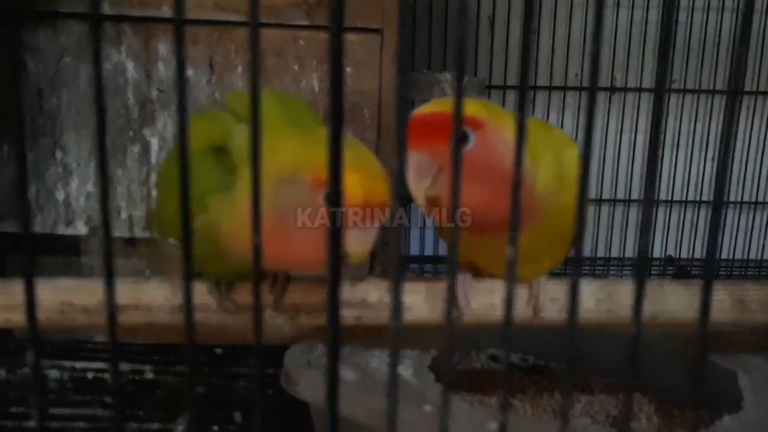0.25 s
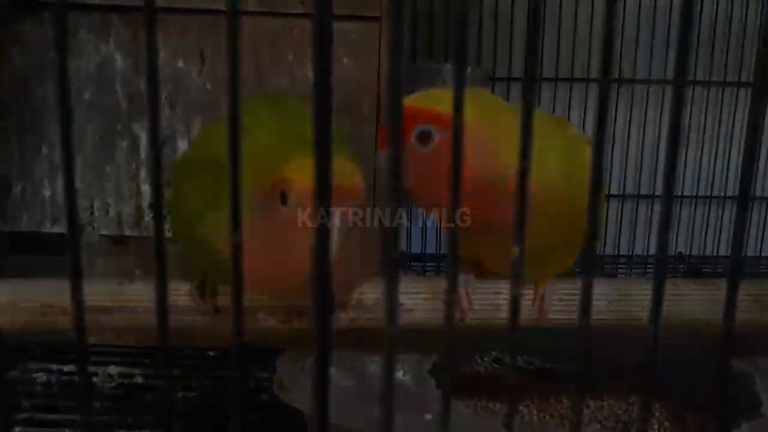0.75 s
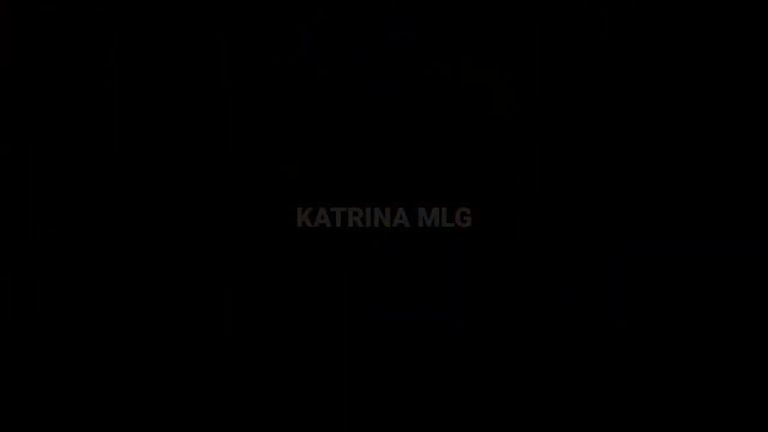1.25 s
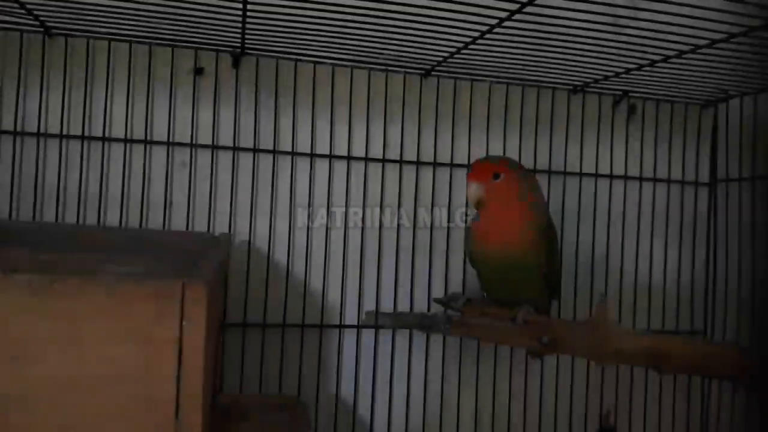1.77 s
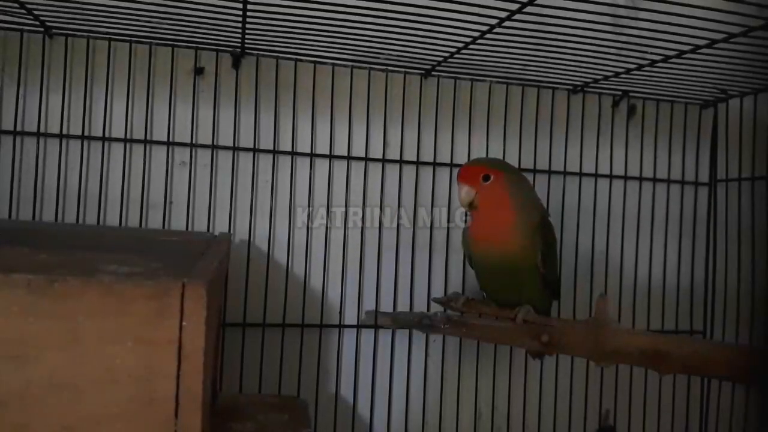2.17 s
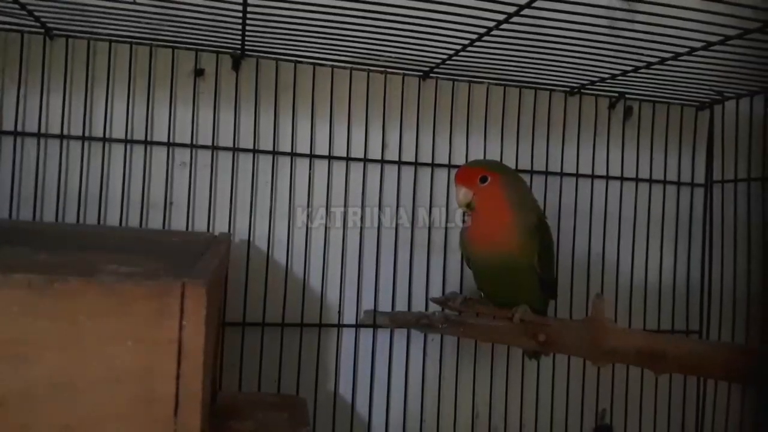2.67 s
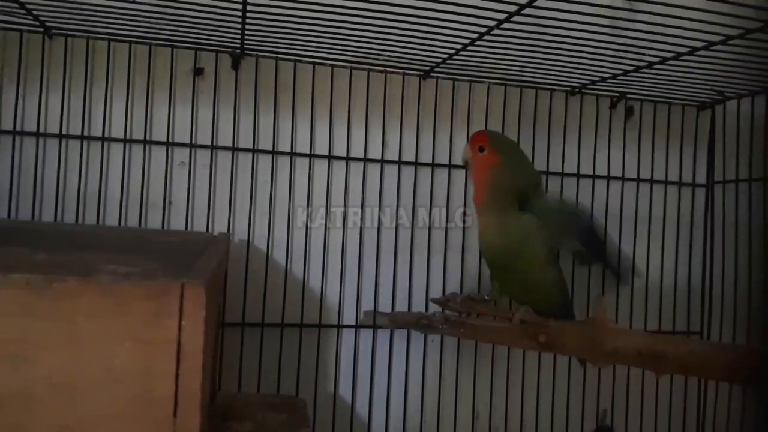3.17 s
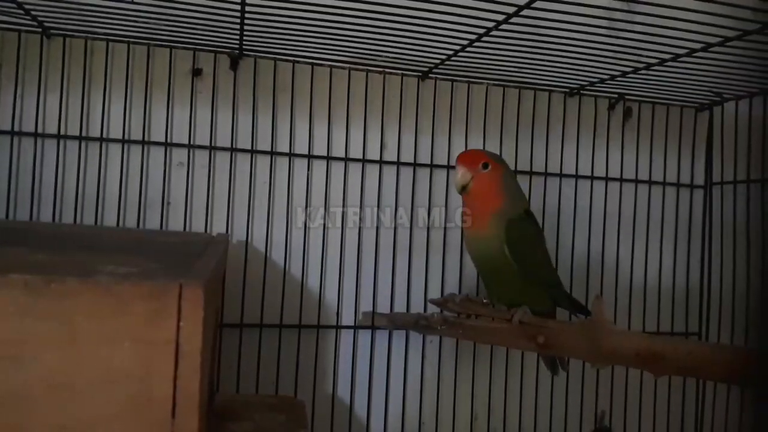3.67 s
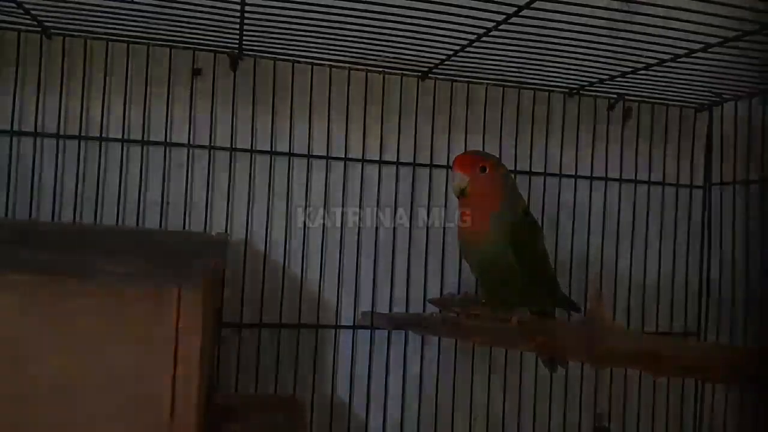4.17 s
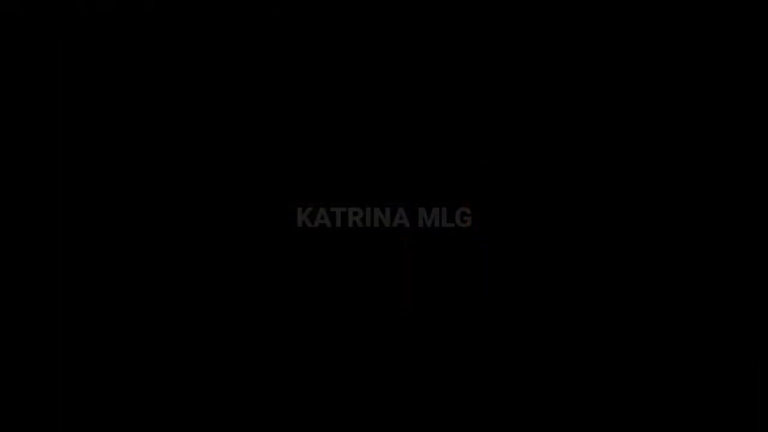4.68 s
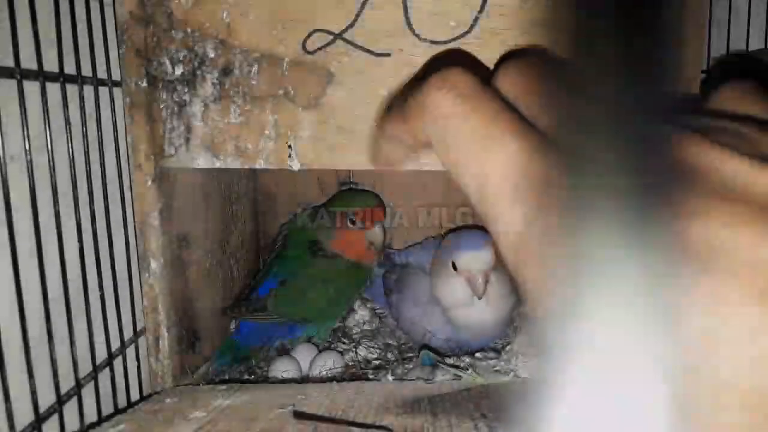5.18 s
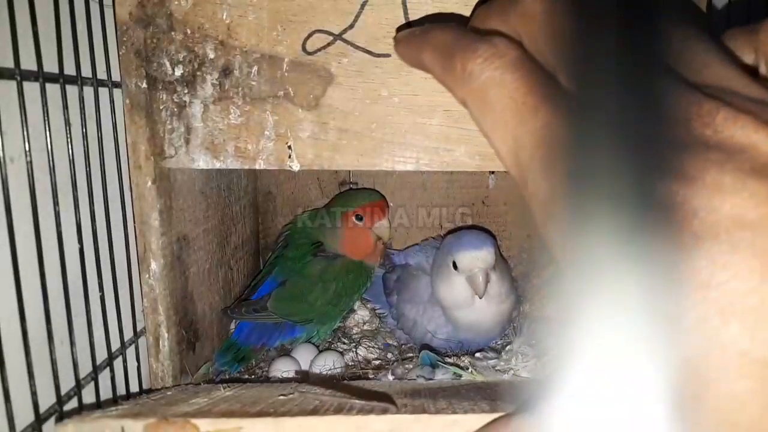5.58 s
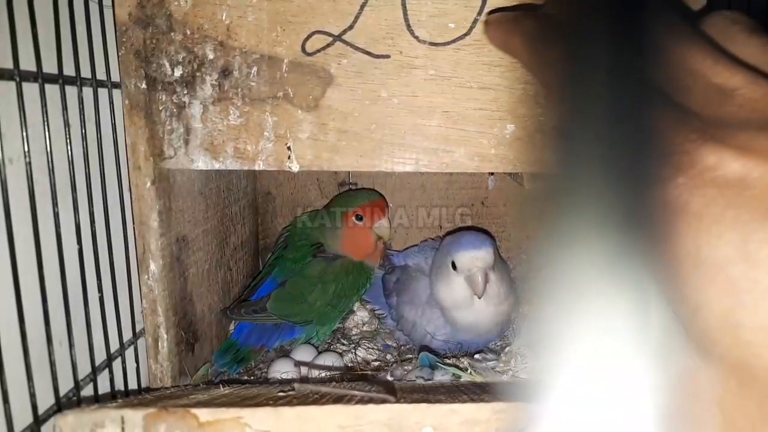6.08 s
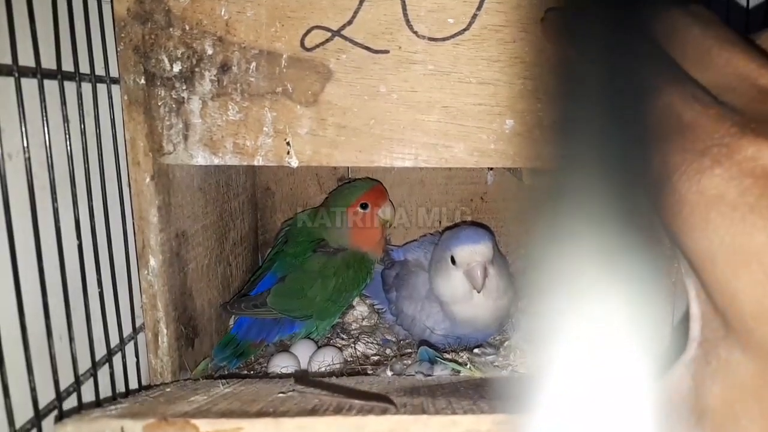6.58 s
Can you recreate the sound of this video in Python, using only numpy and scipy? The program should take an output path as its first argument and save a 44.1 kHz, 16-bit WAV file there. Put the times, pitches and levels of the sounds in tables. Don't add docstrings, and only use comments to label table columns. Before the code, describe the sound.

Lovebirds call close to the microphone in a small reverberant space. After a quiet twittering opening come separate shrill shrieks, a loud steady one leading into a rapid harsh burst with flapping and feather rustle in the middle. A brief lull, then several rougher, weaker calls smeared by wall reflections. An abrupt change leaves faint faraway birds, low hum and small knocks. The left channel is clear, the right nearly blocked and much duller.

```python
import sys
import numpy as np
from scipy import signal
from scipy.fft import rfft, irfft, next_fast_len
from scipy.io import wavfile
from scipy.ndimage import uniform_filter1d, minimum_filter1d

SR = 44100
rng = np.random.default_rng(int(sys.argv[2]) if len(sys.argv) > 2 else 0)


def bounce(signal):
    frames = np.transpose(np.atleast_2d(signal))
    limited = np.clip(frames, -1, 1)
    pcm = np.round(limited * 32767).astype(np.int16)
    wavfile.write(sys.argv[1], SR, pcm)


def boost_factor(decibels):
    exponent = np.asarray(decibels, float) / 20
    return 10 ** exponent


N = 301555


def evened(x):
    return x / np.sqrt(np.mean(x ** 2) + 1e-20)


def read(points, hz):
    f, value = np.transpose(points)
    return np.interp(np.log(hz + 1), np.log(f + 1), value)


def coloured(x, points):
    size = next_fast_len(len(x) + 512)
    gain = boost_factor(read(points, np.fft.rfftfreq(size, 1 / SR)))
    return irfft(rfft(x, size) * gain, size)[:len(x)]


def add(mix, s, sound):
    part = mix[round(s * SR):][:len(sound)]
    part += sound[:len(part)]


def wobble(count, hz):
    lowpass = signal.butter(2, hz, fs=SR, output="sos")
    return evened(signal.sosfilt(lowpass, rng.standard_normal(count + 500))[500:])


def fuzzy(hz, width):
    wander = wobble(len(hz), width / 2) + 1j * wobble(len(hz), width / 2)
    return (wander * np.exp(2j * np.pi * np.cumsum(hz) / SR)).real


def near_birds():
    # t/s, rise/s, hold/s, effort/dB, swell over the hold/dB
    long_calls = [
        (.79, 0.033, .057, -18, 3),
        (1.214, 0.031, 0.083, -28.5, 2.5),
        (1.524, 0.027, .1, -24, 3),
        (2.701, .026, 0.133, -17, 0),
        (4.25, 0.043, 0.083, -26, 3),
        (4.601, 0.029, 0.073, -24, 2),
        (4.966, 0.027, 0.19, -26.5, -8.5),
        (5.334, 0.018, 0.098, -38, -3),
    ]
    # f when risen/Hz, f at the turn/Hz, turn within the hold/0-1, f after the break/Hz, harshness/0-1
    tunes = [(2325, 2450, .45, 2000, .08), (2440, 2529, .66, 2220, .13), (2337, 2573, .98, 2255, .14),
             (2240, 2390, .8, 2080, .5), (2330, 2400, .6, 2500, .5), (2220, 2390, .95, 2540, .4),
             (2350, 2440, .32, 2270, .38), (2000, 2330, .92, 2090, .42)]
    # opening harshness/0-1, climb made half way up/0-1, break/s, harshness after it/0-1, tail/s
    edges = [(.8, .75, .025, .45, .008), (.6, .95, .008, .42, .042), (.7, .5, .008, .9, .035),
             (.12, .0, .007, .8, .025), (.7, .6, .007, .75, .03), (.9, .25, .006, .6, .02),
             (.75, .55, .01, .7, .022), (.6, .3, .04, .4, .008)]
    # f/Hz, level relative to the effort/dB, and harshness at the top/0-1
    openings = [(1898, -22, .1), (1898, -14, .13), (1850, -22, .2), (1900, -15, .55), (1700, -18, .28),
                (1898, -15, .27), (1898, -22, .5), (1720, -10, .45)]
    # wall share/dB, brightness/dB per octave, beam over 11.5 kHz/dB, fundamental/dB, air hiss/dB
    long_places = [(-2.5, -2.5, 3, -1.5, -7), (-1, -3, 8.5, 0.5, -4), (-2, -4.5, 9.5, -0.5, 1.5),
                   (-3, 3.5, -5.5, 6, 1), (-4, 3.5, -0.3, 6.5, -1), (-3, 2, -0.5, 4, 5),
                   (-2.5, 2.5, -0.5, 5.5, 5.5), (-6, -0.5, 5, 3.5, 5)]
    # t/s, length/s, effort/dB, swell/dB, harshness/0-1
    notes = [(.796, .012, -26.5, 1.5, .4), (2.036, .024, -42, -17, 0.45), (2.725, .15, -27, 2, .25),
             (2.985, .013, -14.5, 1, .7), (2.998, .043, -7, -2, .05), (3.041, .013, -9, -2.5, 0.5),
             (3.055, 0.045, -11.5, -3.5, .05), (3.098, 0.04, -21, -8, 0.12), (3.083, .09, -19, -8, 0.3),
             (3.086, 0.088, -17, -9, 0.42), (3.24, .01, -21, 10, 0.6), (3.25, .0258, -11.5, -3, .2),
             (3.2765, .073, -12.5, 0, 0.05), (3.355, .012, -15, -6, .2), (3.367, .04, -17, -16.5, .75),
             (4.184, 0.04, -37, -1, 0.4), (4.18, 0.035, -43, -6, 0.4), (1.657, .045, -25, -6, .85),
             (2.865, .06, -22, -10, .3), (2.824, .045, -32, -3, .1), (3.052, .04, -36, -4, .2),
             (3.348, .008, -17, 0, .3), (4.705, .095, -25, -5, .75), (4.973, .012, -29, 0, .9),
             (4.99, .09, -31, -4, .35), (4.785, .03, -44, -6, .2), (5.492, .06, -44, -4, .35)]
    # f at start/Hz, f at end/Hz
    glides = [(2601, 2484), (3744, 3500), (6560, 6640), (1945, 3000), (2462, 2468), (2480, 2620),
              (6515, 6505), (6510, 6490), (2730, 2720), (2430, 2250), (1820, 1800), (2175, 2245),
              (2070, 2092), (2920, 2900), (2705, 2300), (5600, 5150), (6900, 6100), (2600, 2280),
              (2650, 2450), (10950, 10850), (15250, 15350), (6500, 7100), (2600, 2500), (2050, 2300),
              (2690, 2620), (3620, 3650), (2090, 2440)]
    # wall share/dB, brightness/dB per octave, beam over 11.5 kHz/dB, fundamental/dB
    note_places = [(-5, -3.5, -5.5, -13.5), (5, -4, -15, -4.5), (-5, -8, -6, 2.5), (-19, -2, -4, -4),
                   (-18, -4.5, -2, -14), (-19, -2, -4, -9), (-13, -4, -4, 2), (-13, -4, -4, 2),
                   (-8.5, .5, -1.5, -4), (-5, 1, -7, -4), (-13, 5, -4, 1.5), (-16, 3, -2, 7),
                   (-19, -1.5, 1, -12), (-3, -8, 5, -9), (-6, -5.5, -.5, -15.5), (-9.5, -1.5, -35, -4),
                   (-6, -4, 0, 2), (-6.5, -2, -1.5, -6.5), (-4, 9, -16, 6), (-6, 0, 0, 0), (-8, 0, 0, 0),
                   (-15.5, -4, -3, 1), (-2, -0.5, 4, 2), (-16, -13, 0, -8), (-3, -4.5, 12, -2),
                   (1, -12, -2, -2), (-9.5, -0.5, 0, 1)]
    direct, bounced = np.zeros((2, N))
    kinds = [(long_call, (long_calls, tunes, edges, openings), long_places),
             (short_note, (notes, glides), note_places)]
    for shape, tables, places in kinds:
        for call, (wet_db, tilt_db, beam_db, first_db, *air_db) in zip(np.hstack(tables), places):
            s, sound = shriek(shape(*call, first_db), wet_db, tilt_db, beam_db, *air_db)
            add(direct, s, sound)
            add(bounced, s, boost_factor(wet_db) * sound)
    return direct, bounced


def long_call(start, rise, hold, effort_db, swell_db, risen_hz, top_hz, top, broken_hz, harsh,
              open_harsh, climbed, snap, end_harsh, tail, open_hz, open_db, top_harsh, first_db):
    lag_db = -5.5
    arch_db, sag_hz_per_s = 0.5, 1400
    break_db, tail_db, tail_thin_db = -4.5, -15, -14.5
    held, end_db = start + rise + hold, effort_db + swell_db
    after_top = (1 - top) * hold
    half_hz = open_hz + climbed * (risen_hz - open_hz)
    return [(start, effort_db + open_db, open_hz, open_harsh, first_db),
            (start + rise / 2, effort_db + lag_db, half_hz, open_harsh, first_db),
            (start + rise, effort_db, risen_hz, harsh, first_db),
            (held - after_top, effort_db + top * swell_db + arch_db, top_hz, top_harsh, first_db),
            (held, end_db, top_hz - sag_hz_per_s * after_top, top_harsh, first_db),
            (held + snap, end_db + break_db, broken_hz, end_harsh, first_db),
            (held + snap + tail, end_db + tail_db, broken_hz, end_harsh, first_db + tail_thin_db)]


def short_note(start, length, effort_db, swell_db, harsh, first_hz, last_hz, first_db):
    return [(start, effort_db, first_hz, harsh, first_db),
            (start + length, effort_db + swell_db, last_hz, harsh, first_db)]


def shriek(rows, wet_db, tilt_db, beam_db, air_db=0):
    # f/Hz, level/dB
    beak_colour = [(1400, -26), (2300, -16), (2750, -11), (3230, -26), (3750, -2.5), (5000, -2), (6500, -5),
                   (7400, -19.5), (8500, -23.5), (10000, -22.5), (12500, -14), (14800, -26), (15500, -33.5),
                   (15900, -71.5)]
    # f/Hz, level/dB
    breath_colour = [(700, -36.5), (1500, -29.5), (2400, -15.5), (3250, -9.5), (4800, -12), (6500, -14),
                     (8400, -19.5), (12000, -23), (15400, -22), (15900, -68)]
    rasp_hz = 165
    s, *columns = np.transpose(rows)
    t = np.arange(s[0], s[-1], 1 / SR)
    effort_db, hz, harsh, first_db = (np.interp(t, s, c) for c in columns)
    harsh = np.clip(harsh, 0, 1)
    rasp = np.cos(2 * np.pi * np.cumsum(rasp_hz * (1 + .3 * wobble(len(t), 40))) / SR)
    tremble = .05 * wobble(len(t), 300) + .045 * rasp
    turns = np.cumsum(hz * (1 + harsh * tremble)) / SR
    flutter = .35 * wobble(len(t), 170) + .45 * wobble(len(t), 450) + .9 * rasp
    swing = 1 + harsh * flutter
    tone = np.zeros(len(t))
    for k in range(1, 9):
        beam = beam_db * np.clip(k * hz / 1000 - 11, 0, 1)
        level_db = tilt_db * np.log2(k * hz / 5000) + first_db * (k == 1) + beam
        tone += boost_factor(level_db) * (k * hz < .4 * SR) * np.cos(2 * np.pi * k * turns)
    air = evened(coloured(rng.standard_normal(len(t)), breath_colour))
    fade = np.minimum(1, np.minimum(t - s[0], s[-1] - t) / .0012)
    steady_hiss = boost_factor(-45 - .9 * wet_db)
    voice = evened(coloured(tone * swing * fade, beak_colour))
    hiss = (steady_hiss + .3 * harsh ** 2) * fade * boost_factor(air_db) * air
    return s[0], boost_factor(effort_db) * (voice + hiss)


def wings():
    # t/s, peak level/dB, push/ms
    beats = [(3.0415, -14, 0.77), (3.047, -13.5, 0.77), (3.0505, -14.5, 0.45), (3.0525, -12, .7),
             (3.066, -29, 0.56), (3.07, -21.5, 3), (3.079, -29, 1.7), (3.277, -36, 1.4),
             (3.285, -38.5, 2.2), (3.349, -18, 0.71), (3.356, -35.5, 0.89), (3.364, -51, 8.2)]
    # t of the loudest/s, level/dB, swell/s, fade/s
    rustles = [
        (2.824, -48.5, 0.12, 0.1),
        (3.05, -23.5, 0.049, 0.052),
        (3.12, -45, 0.11, 0.098),
        (3.282, -35, .05, 0.036),
        (3.35, -28.5, 0.055, 0.038),
        (4.39, -60, 0.19, 0.08),
        (4.79, -63.5, 0.38, 0.19),
        (5.08, -66, 0.16, 0.97),
    ]
    feather_colour = [(40, -22.5), (140, -4.5), (700, -10.5), (1600, -10.5), (3500, -10), (7000, -9),
                      (8600, -39.0), (11000, -14.5), (15500, -18.0)]
    depth_db = -23
    out = np.zeros(N)
    for k, (s, db, ms) in enumerate(beats):
        u = np.arange(1500) / SR * 1000 / ms
        sign = (-1) ** (k // 2 + 1)
        add(out, s, sign * boost_factor(db) * np.sin(np.pi * u) * np.exp(-.9 * u) * 1.4)
    out = coloured(out, [(25, -11), (110, 0.5)])
    for peak, peak_db, swell, fade in rustles:
        s = (peak - swell, peak, peak + fade)
        db = peak_db + depth_db * np.array([1, 0, 1])
        t = np.arange(s[0], s[-1], 1 / SR)
        puffs = rng.standard_normal(len(t)) * boost_factor(2.5 * wobble(len(t), 120))
        noise = evened(coloured(puffs, feather_colour))
        add(out, s[0], boost_factor(np.interp(t, s, db) + 3.5) * noise * signal.windows.tukey(len(t), .1))
    return out


def walls(x):
    # f/Hz, t60/s
    ringing = [(300, 0.24), (2500, 0.21), (5000, 0.21), (9000, 0.19), (14000, 0.096)]
    taps = np.zeros((2, SR // 2))
    grid = np.arange(130, SR // 2 - 16, 16)
    at = grid + rng.integers(0, 16, (2, len(grid)))
    np.put_along_axis(taps, at, rng.choice([-1., 1.], at.shape), 1)
    hz, t, z = signal.stft(taps, SR, nperseg=256)
    decay = boost_factor(-60 * t / read(ringing, hz)[:, None])
    tail = signal.istft(z * decay, SR, nperseg=256)[1]
    return signal.fftconvolve(x[None], tail / np.linalg.norm(tail[0]), axes=1)[:, :N]


def far_birds():
    # t/s, length/s, f/Hz, width/Hz, level/dB
    twitters = [(.21, .26, 6160, 260, -58.5), (.275, .065, 4330, 110, -45.5), (.32, .25, 3830, 70, -54),
                (.34, .2, 3080, 200, -64), (.24, .05, 4150, 100, -60), (.33, .12, 4400, 330, -53),
                (.39, .11, 3980, 70, -52), (.44, .12, 4300, 500, -60), (3.72, .12, 4800, 200, -87),
                (3.72, .08, 6300, 200, -86), (.18, .39, 5400, 1700, -62), (.5, .3, 5600, 1400, -64),
                (.28, .17, 13500, 3800, -71), (.59, .13, 3980, 70, -68), (.51, .045, 6400, 600, -65.5),
                (.64, .11, 5900, 760, -68), (5.92, .11, 6550, 150, -69), (5.9, .14, 5000, 350, -70),
                (5.575, .1, 4900, 220, -69), (5.66, .3, 6150, 350, -74), (5.8, .15, 4460, 90, -73),
                (5.64, .52, 5200, 1500, -72), (6.04, .11, 6530, 200, -66), (6.04, .12, 4100, 400, -70),
                (6.22, .12, 6420, 280, -66), (6.22, .14, 5170, 800, -72), (6.71, .33, 4850, 290, -62),
                (6.77, .074, 3900, 450, -60), (6.79, .05, 2980, 120, -65), (6.78, .06, 5980, 700, -63)]
    # t/s, length/s, f/Hz, width/Hz, level/dB
    thuds = [(.78, .023, 360, 19, -57.5), (2.15, .037, 495, 63, -68.5), (2.48, .042, 471, 37, -50),
             (5.19, .14, 365, 45, -68), (5.17, .093, 850, 49, -72), (5.39, .12, 1150, 15, -73),
             (4.55, .218, 193, 210, -65), (5.15, .538, 300, 390, -70), (2.0, .15, 1700, 900, -72),
             (2.43, .2, 940, 760, -68), (6.4, .11, 2025, 1000, -74), (6.62, .19, 367, 355, -62.5),
             (5.5, .22, 1150, 15, -79), (5.8, .12, 1290, 25, -77), (5.82, .08, 1060, 25, -77),
             (6.62, .06, 850, 60, -72)]
    out = np.zeros(N)
    for s, length, hz, width, db in twitters + thuds:
        held = np.full(round(length * SR), hz)
        add(out, s, boost_factor(db) * fuzzy(held, width) * signal.windows.tukey(len(held), .35))
    return out


def knocks():
    # t/s, level/dB, centre f/Hz, width/Hz
    hits = [
        (1.639, -65.5, 924, 950),
        (1.767, -51.5, 1163, 720),
        (1.958, -67, 1695, 913),
        (2.42, -55, 3460, 5000),
        (2.558, -52, 3360, 509),
        (2.559, -57.5, 5390, 3470),
        (6.73, -60, 1330, 1173),
    ]
    out, t = np.zeros(N), np.arange(2000) / SR
    for s, db, hz, width in hits:
        add(out, s, boost_factor(db - 60 * t / 0.098) * fuzzy(hz + 0 * t, width))
    return out


def floor():
    # t/s, level/dB
    hum_levels = [(0, -66.5), (.36, -62), (.72, -67.5), (1.01, -67), (1.478, -74.5), (2.441, -65.5),
                  (3.09, -67), (3.22, -66), (3.41, -82), (4.02, -88.5), (4.45, -78), (4.65, -67.5),
                  (4.76, -72.5), (5.1, -73.5), (5.46, -66.5), (6.3, -65.5), (6.759, -62), (6.84, -57)]
    # f/Hz, level/dB per Hz
    hum_colour = [(15, -48), (25, -23.5), (108, 4), (249, -12.5), (476, -18.5), (659, -24.5), (3520, -32),
                  (6380, -32), (7310, -40), (14800, -34.5), (16000, -38.5)]
    # f/Hz, level/dB
    hiss_colour = [(25, -4.5), (100, -2.5), (300, -18), (1000, -20.5), (3000, -24), (8000, -29),
                   (15500, -29)]
    s, db = np.transpose(hum_levels)
    level_db = np.interp(np.arange(N) / SR, s, db)
    lumps = boost_factor(-0.5 + 1.8 * wobble(N, 24))
    hum = evened(coloured(rng.standard_normal(N), hum_colour)) * lumps
    hiss = evened(coloured(rng.standard_normal(N), hiss_colour))
    hiss_db = 0.43 * (level_db + 70.5) - 80.5
    return np.array([hum * boost_factor(level_db), hiss * boost_factor(hiss_db)])


def scene():
    # f/Hz, level/dB
    housing = [(2800, 0), (3130, -14), (3500, 0), (7950, 0), (8500, -8), (9050, 0)]
    # f/Hz, level/dB
    blocked = [(300, -48.5), (1500, -29), (2400, -20), (5000, -25), (7000, -21), (9000, -18.5),
               (14000, -26)]
    change_s = 5.551
    direct, bounced = near_birds()
    near = boost_factor([[-3.5], [-8]]) * direct + boost_factor([[.1], [3]]) * walls(bounced)
    near *= np.clip((change_s - np.arange(N) / SR) / 0.0017, 0, 1)
    far = far_birds() + knocks()
    distant = boost_factor(-6.0) * far + boost_factor(-4.5) * walls(far)
    birds = near + boost_factor([[.1], [-6]]) * distant
    birds[0] = coloured(birds[0], housing)
    birds[1] = coloured(birds[1], blocked)
    birds[0] += wings()
    return (birds + floor()) * boost_factor(6)


def limited(x, ceiling_db):
    room = np.minimum(boost_factor(ceiling_db) / (abs(x) + 1e-9), 1)
    room = minimum_filter1d(room, size=89, axis=1)
    return x * uniform_filter1d(room, size=89, axis=1)


def band_limit(x):
    return signal.sosfilt(signal.butter(12, 16000, fs=SR, output="sos"), x)


def record(dry):
    hz, t, z = signal.stft(dry, SR, nperseg=1024)
    bands = abs(z[:, :512].reshape(2, 64, 8, -1) ** 2).mean(2)
    bands = uniform_filter1d(bands, size=3, axis=2)
    threshold = boost_factor(np.array([-78, -42]))[:, None, None]
    kept = bands > threshold * bands[:, 4:].max(1, keepdims=True)
    kept[:, :6] = True
    z[:, :512] *= np.repeat(np.maximum(kept, .03), 8, axis=1)
    thinned = signal.istft(z * (hz < 15900)[:, None], SR, nperseg=1024)[1][:, :N]
    thinned = signal.sosfilt(signal.butter(2, 35, "high", fs=SR, output="sos"), thinned)
    return band_limit(limited(thinned, -1.1))


dry = scene()
out = record(dry)
bounce(out)
```